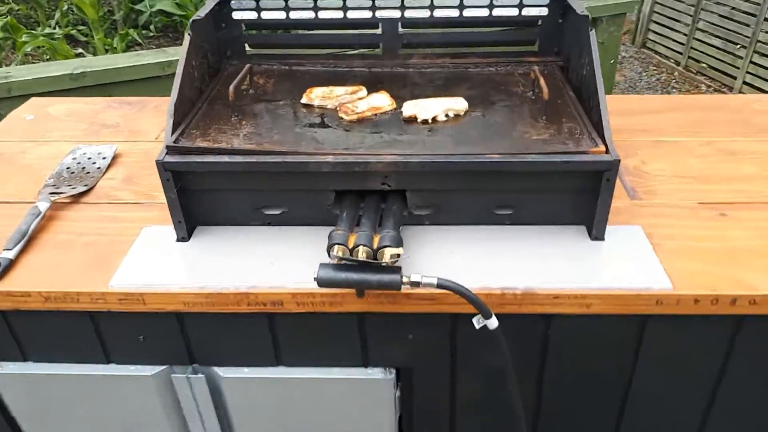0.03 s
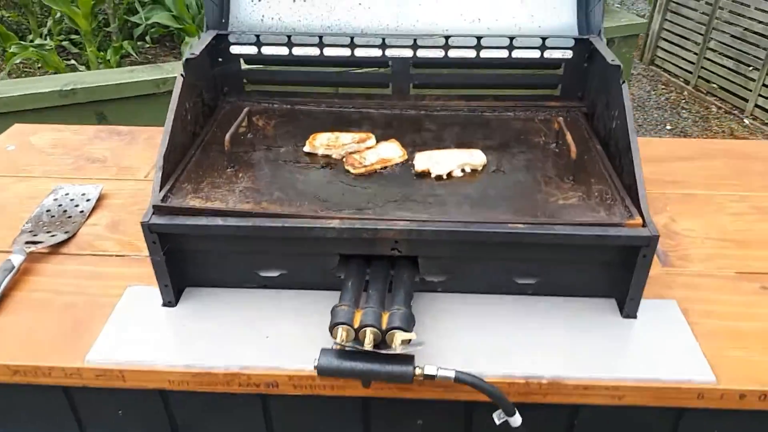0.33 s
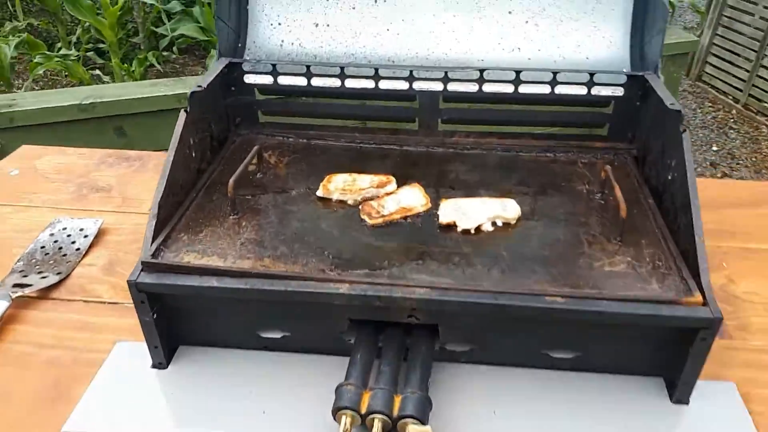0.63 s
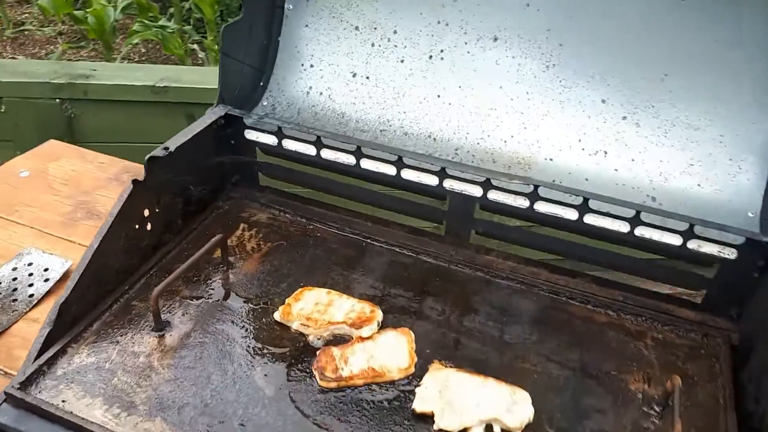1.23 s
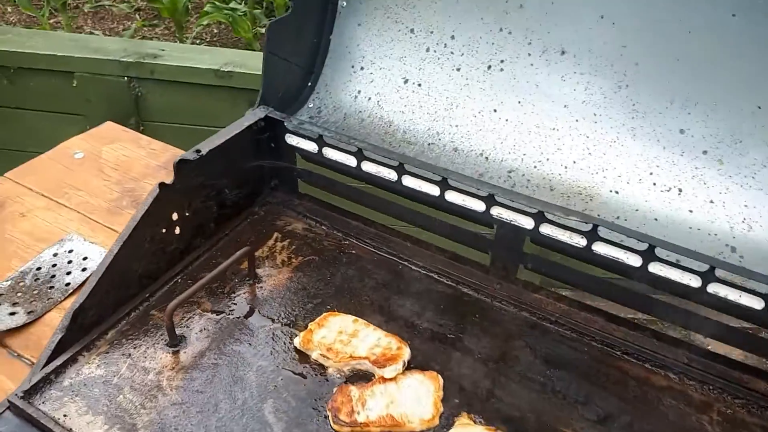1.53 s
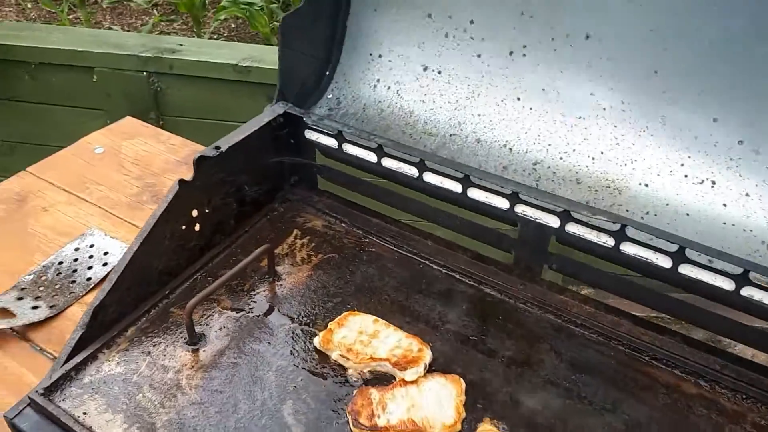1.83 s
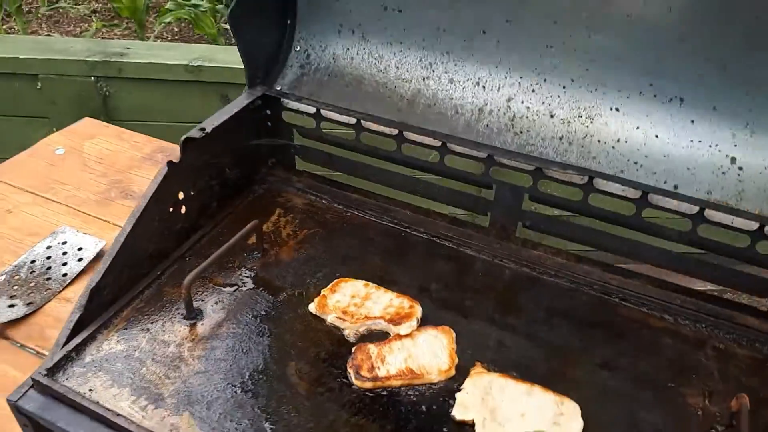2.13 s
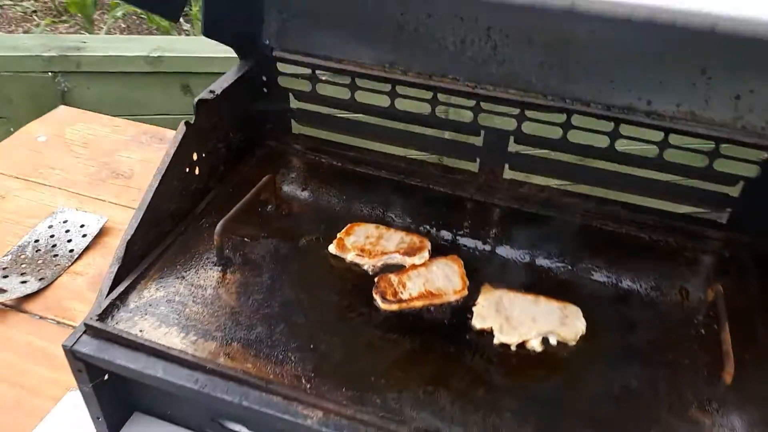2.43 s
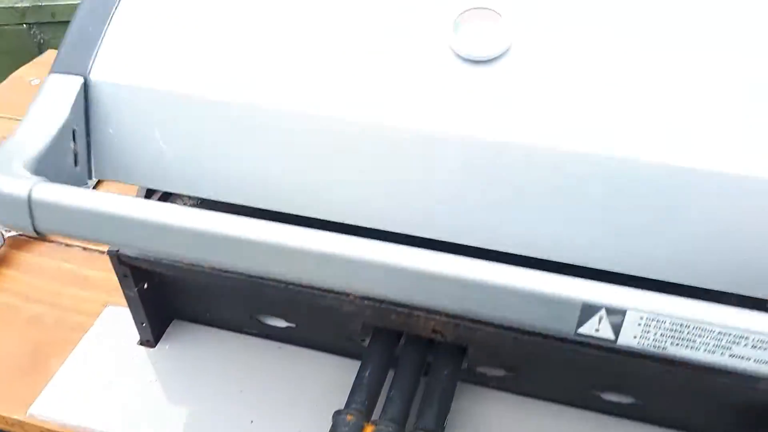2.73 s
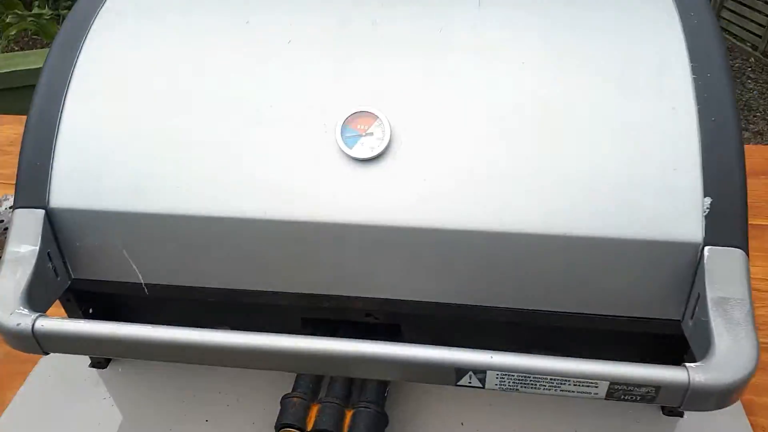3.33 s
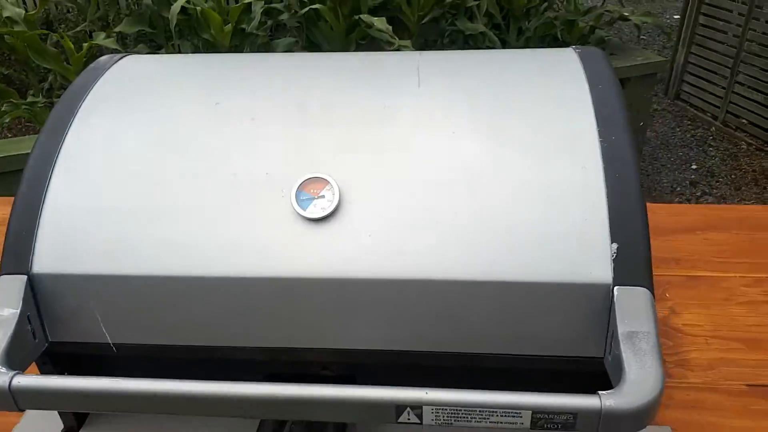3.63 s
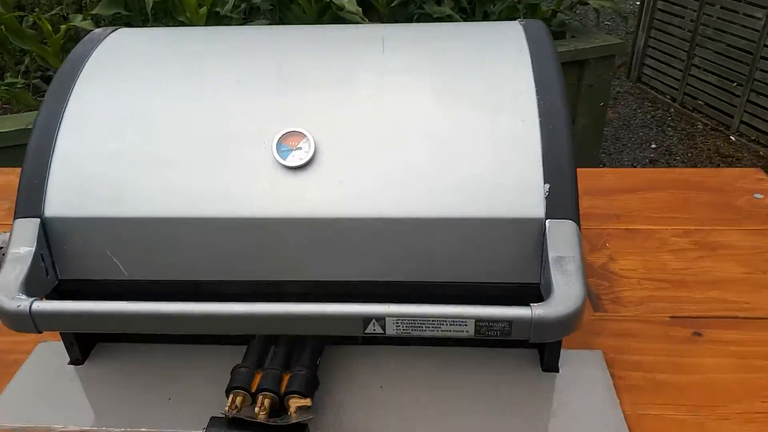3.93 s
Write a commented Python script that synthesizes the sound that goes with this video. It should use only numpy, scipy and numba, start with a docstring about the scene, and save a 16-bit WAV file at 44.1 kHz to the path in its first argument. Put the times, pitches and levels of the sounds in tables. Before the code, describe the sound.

Meat sizzles, bubbles and spits on an outdoor griddle, growing louder as the microphone comes close. A steel lid scrapes down on its hinges and lands with a heavy, ringing clang, leaving the sizzle much quieter.

```python
"""Closing the lid on a griddle

Outdoors, close to a gas griddle, over a faint rumble. Meat sizzles: water flashes to steam in a
fine fizz, fat bubbles and spits, all louder as the microphone comes near the plate. The sheet-steel
lid is pulled down on scraping hinges, lands at 3.1 s with a heavy, chattering clang and rings on.
Under the shut lid the sizzle is much quieter."""
import sys
import numpy as np
from scipy import signal
from scipy.fft import rfft, irfft
from scipy.io import wavfile
from scipy.ndimage import uniform_filter1d, map_coordinates
from numba import njit

SR = 44100
rng = np.random.default_rng(int(sys.argv[2]) if len(sys.argv) > 2 else 0)


def to_wav(sig):
    """Store sig (one row per channel, or 1-D mono) as 16-bit WAV at the path in sys.argv[1].

    Samples outside -1..1 are clipped; the rate is SR.
    """
    pcm = np.clip(np.atleast_2d(sig), -1, 1) * 32767
    pcm = np.round(pcm).astype(np.int16)
    wavfile.write(sys.argv[1], SR, pcm.T)  # frames by channels


N = 176400
T = np.arange(N) / SR

# likeness of the noise on the two sides of the microphone: freq_hz, correlation
LIKENESS = [(50, .93), (140, .997), (300, .96), (600, .7), (1200, .3), (2300, .06), (6000, .01)]
# stereo lean of the whole scene: freq_hz, left_minus_right_db
BALANCE = [(120, 2.2), (250, -0.5), (450, 2), (700, 0.5), (1250, -5.5), (2300, -5), (3200, 3), (4400, 6),
           (6000, -3), (7700, -5.5), (9200, 1), (11000, -1), (15000, 2)]
# slow rise of the outdoor rumble: time_s, gain_db
RUMBLE_RISE = [(0, 2.5), (.6, 2.5), (1.3, 4), (1.9, 5.5), (2.6, 6), (4, 7.5)]
# fizz, hiss (strongest over the plate) and bubbling fat at the microphone: time_s, level_db
FIZZ_LEVEL = [(0, -46.5), (.4, -48), (.75, -45.5), (1.35, -44), (1.9, -44), (2.3, -42), (2.6, -42),
              (2.76, -48), (3.08, -51.5), (3.25, -56), (3.62, -57), (3.78, -51.5), (3.83, -59.5),
              (4, -60.5)]
HISS_LEVEL = [(0, -73.5), (.5, -56), (.9, -55), (1.4, -50), (2.1, -49.5), (2.55, -52.5), (2.8, -56),
              (3.1, -59.5), (3.6, -73), (3.78, -65), (3.85, -74), (4, -68)]
BUBBLE_LEVEL = [(0, -56), (.45, -50.5), (.7, -50), (1.4, -44), (2.1, -45.5), (2.6, -54), (2.85, -52.5),
                (3.25, -54.5), (3.62, -59.5), (3.77, -55.5), (3.84, -63), (4, -62)]
# spectra of the open air and of the cooking: freq_hz, relative_db
RUMBLE_COLOUR = [(20, -44), (45, -0.5), (68, 1), (110, -7.5), (200, -13.5), (500, -25), (2000, -35),
                 (16000, -56)]
FIZZ_COLOUR = [(300, -24), (1200, 0.5), (2300, -2.5), (3200, -4.5), (5000, -9.5), (6000, -4.5),
               (7100, -1.5), (7650, 2), (8200, -6), (8900, -10.5), (11000, -5.5), (15500, -6.5)]
HISS_COLOUR = [(1000, -10.5), (2600, -6.5), (3500, -3), (4900, 6.5), (5700, -0.5), (6800, -0.5),
               (8500, -34), (16000, -41)]
SEETHE_COLOUR = [(100, -26), (250, -20), (450, 4.5), (640, -4), (900, 1), (1250, -1.5), (1600, -1.5),
                 (2100, 0.5), (2900, -4), (5000, -22), (16000, -47)]
SPIT_COLOUR = [(200, -68), (1500, 3), (3200, -3), (5000, 3), (6500, 1.5), (7700, 10.5), (9000, -6),
               (12000, -0.5), (16000, -6.5)]
SPLASH_COLOUR = [(200, -21), (700, -17), (1400, 0), (2500, 23), (3500, -14), (8000, -26), (16000, -31)]
# hollow of the open cook box, rising as the microphone comes over it: time_s, centre_hz, gain_db
BOX_HOLLOW = [(0, 1340, -5), (.45, 1600, 2.5), (.75, 1840, 9), (.97, 1840, 11), (1.25, 1970, 8.5),
              (1.5, 2120, 2), (2.1, 1980, -13), (4, 1950, 1)]
# reflection off the plate: time_s, delay_ms, gain_db
PLATE_BOUNCE = [(0, .92, -3.5), (.5, .81, -3.5), (1.1, .74, -5.5), (2, .78, -12), (3.1, .9, -12),
                (4, .98, -5)]
# bands cancelled by echoes off the steel walls: time_s, centre_hz, left_depth, right_depth
NOTCH_LOW = [(0, 576, 0.5, 0.1), (.45, 616, .7, .45), (.7, 710, 0.1, .1), (.9, 1280, 0.8, 0.55),
             (1.2, 1400, 0.9, 0.64), (1.5, 1420, 0.4, 0.2), (2.2, 1420, 0, 0)]
NOTCH_MIDDLE = [(0, 1870, 0.96, 0.13), (.47, 2000, 1, 0.0031), (.58, 2250, 0, 0), (.85, 2540, .55, 0.4),
                (1.2, 2670, 0.85, 0.38), (1.7, 2680, 0.88, 0.35), (2.4, 2460, 0.14, 0), (3, 2500, 0, 0)]
NOTCH_HIGH = [(0, 4340, 0.021, 0.68), (.45, 4250, 0.12, 0.73), (.72, 4020, 0, 0.44),
              (1.15, 3780, 0.1, 0.26), (1.6, 3740, 0, 0.41), (2.5, 3500, 0, .35), (3.2, 3700, 0, 0.089)]
# sharp spits of fat: start_s, level_db, decay_s
SPITS = [(0.17, -39, 0.0014), (0.211, -30, 0.0006), (0.286, -31.5, 0.0013), (0.333, -30, 0.0011),
         (.356, -41, 0.0029), (.4657, -39, 0.0028), (0.6687, -32.5, 0.00073), (0.708, -30.5, 0.0008),
         (0.7175, -30.5, 0.00069), (1.0322, -26.5, 0.0011), (1.273, -30, 0.001), (1.404, -33, 0.00055),
         (1.4452, -32, .0025), (1.4528, -28.5, 0.0034), (1.51, -33, 0.0013), (1.759, -30, 0.00086),
         (1.8664, -27, 0.0009), (2.3114, -27, 0.0012), (2.409, -33, 0.0011), (2.422, -26, 0.0015),
         (2.5176, -28, .0007), (2.528, -32, 0.00063), (2.8377, -39, 0.0025)]
# big bubbles that pop: start_s, level_db, pitch_hz
POPS = [(0.286, -35, 1620), (0.5536, -36, 1900), (.569, -36, 1520), (0.6089, -31.5, 2140),
        (.622, -36, 1600), (0.702, -34, 1890), (0.7687, -35, 1970), (0.9617, -28, 1860), (.976, -38, 2050),
        (1.032, -33, 1890), (1.154, -35, 2020), (1.2461, -32, 1910), (1.5105, -30.5, 1300),
        (1.8645, -30, 1090), (1.994, -25, 1990), (2.147, -33, 2040), (2.3256, -29, 1900)]
# three spurts of steaming juice, then a bright, ringing tick of the handle as the hand lets go:
# peak_s, level_db, rise_s, decay_s
SPURTS_AND_TICK = [(2.467, -37.5, 0.0024, .008), (2.519, -32, 0.0042, 0.013), (2.588, -34, 0.0079, 0.0083),
                   (3.423, -44, 0.014, 0.034)]

# rub of the hinges as the lid swings, then slides down the last stretch: time_s, level_db
SWING_LEVEL = [(1.0, -100), (1.4, -61.5), (1.85, -55), (2.04, -46), (2.12, -71), (2.205, -56), (2.218, -38),
               (2.245, -38), (2.28, -39.5), (2.45, -44), (2.62, -42), (2.74, -43.5), (2.85, -56),
               (2.95, -93)]
SLIDE_LEVEL = [(2.8, -100), (2.89, -50), (2.905, -43), (2.917, -33), (2.96, -35), (3.02, -34), (3.06, -37),
               (3.095, -42), (3.12, -61), (3.3, -100)]
# spectra of the two rasps, the rub that reaches the lid, and the clicks: freq_hz, relative_db
SWING_COLOUR = [(60, -26), (150, -9), (310, 0.5), (480, -2), (690, -2), (1000, -14.5), (1350, -4.5),
                (1650, -3.5), (2050, -6), (2350, -5.5), (2800, -11.5), (8000, -22.5)]
SLIDE_COLOUR = [(60, -8.5), (170, 3), (300, 6.5), (480, -4), (620, -3), (740, 4.5), (1050, -7),
                (1500, -7.5), (2100, -4.5), (2900, -9.5), (4500, -26), (10000, -36)]
HINGE_REACH = [(100, -50), (350, -28), (590, -9), (720, -3.5), (1200, 2), (1700, 6.5), (2300, -0.5),
               (3000, -11), (8000, 2)]
CLICK_COLOUR = [(200, 9.5), (850, -3.5), (1300, -8), (2000, 5), (3200, -2.5), (4150, 5.5), (5000, -47),
                (7700, 4.5), (10000, -27), (16000, -16)]
# two resonances under the lid, sinking as it closes: time_s, low_hz, low_db, high_hz, high_db
CAVITY = [(2.22, 810, -4, 2080, 0.5), (2.45, 725, -0.5, 1990, 0), (2.62, 650, -0.5, 1940, -1.5),
          (2.8, 600, -1, 1900, 0)]
# narrow rings of the rubbed steel: pitch_hz, width_hz, gain_db, left_minus_right_db
SWING_RINGS = [(1250, 290, -12.5, 17), (2900, 150, -15, 0)]
SLIDE_RINGS = [(742, 206, -4.5, -3), (1665, 120, -12.5, -4.5)]
# light knocks of lid and hinge: start_s, level_db, pitch_hz, decay_s
KNOCKS = [(1.866, -43.5, 128, 0.064), (2.2136, -27.5, 895, 0.0027), (2.222, -25, 324, 0.0096),
          (2.238, -26, 2037, 0.0061), (2.243, -31.5, 1394, 0.011), (2.513, -37, 2290, 0.028),
          (2.592, -36, 2314, 0.02), (3.41, -36, 163, 0.027), (3.583, -45.5, 864, 0.0063)]
# small metal clicks of hinge and handle: start_s, level_db, decay_s
CLICKS = [(2.2143, -36, 0.0032), (3.4174, -37.5, 0.012), (3.5837, -49.5, 0.0043), (3.69, -48, 0.0033)]
# modes of the steel lid: pitch_hz, relative_db, t60_s
LID_MODES = [(74, -20, .5), (116, -24, .35), (143, -17, .3), (150.5, -27, 2.4), (161, -27, 1.8),
             (169, -11, .34), (188, -6, .53), (225, -18, .42), (250, -16, .65), (300, -22, .7),
             (326, -16, .22), (358, -12, .18), (384, -22, .64), (426, -21, .55), (458, -18.5, .5),
             (505, -21, .22), (591, -13, .2), (700, -29, .3), (728, -25, .2), (770, -28, .2),
             (845, -25, .24), (1205, -30, .2), (1280, -34, .25), (1420, -35, .22), (1670, -36, .35),
             (1760, -32, .15), (1890, -39, .35), (2083, -34, .25), (2289, -40, .3)]
# the lid lands and chatters: start_s, strength_db
CONTACTS = [(3.0996, 0.5), (3.1105, 3), (3.1234, 0), (3.1344, -4), (3.154, -6), (3.168, -9.5)]
# spectra of the sheet's dense ring and of each contact's crack: freq_hz, relative_db
SHEET_COLOUR = [(30, -47), (70, -18), (140, 4), (240, 2.5), (450, -4), (560, -15), (750, -10.5),
                (1000, -20), (1350, -23), (2100, -18), (3000, -39), (8000, -37), (16000, -64)]
CRACK_COLOUR = [(30, -47), (70, -43), (200, 7), (400, 1.5), (700, -9.5), (1200, -16), (2000, -23.5),
                (3000, -32.5), (5500, -32), (9000, -40.5), (16000, -42)]

SLIPS_PER_S, SLIP_SPREAD_DB = 700, -1.5


def amp(db):
    """Decibels to gain."""
    return 10 ** (np.asarray(db) / 20)


def unit(x):
    """Scale to rms 1."""
    return x / np.sqrt(np.mean(x ** 2))


def pan(db):
    """Left and right gains for a level difference."""
    return amp([[db / 2], [-db / 2]])


def tracks(rows):
    """Follow each column of (time_s, ...) rows sample by sample."""
    times, *columns = np.array(rows, float).T
    return [np.interp(T, times, column) for column in columns]


def curve(points):
    """Gain over time from (time_s, level_db) points."""
    return amp(tracks(points)[0])


def fade(start, decay_s):
    """Sudden start and exponential decay."""
    return (T >= start) * np.exp(-np.clip((T - start) / decay_s, 0, 60))


def per_bin(points):
    """Spread (freq_hz, value) points over a log-frequency axis."""
    hz, value = np.array(points).T
    return np.interp(np.log(np.fft.rfftfreq(N, 1 / SR) + 1), np.log(hz), value)


def colour(x, points):
    """Causal filter of unit power gain with the given spectrum."""
    cepstrum = irfft(np.log(unit(amp(per_bin(points)))), N)
    cepstrum[1:N // 2] *= 2  # fold to minimum phase
    cepstrum[N // 2 + 1:] = 0
    return irfft(rfft(x) * np.exp(rfft(cepstrum)), N)


@njit
def resonate(x, hz, width_hz):
    """Band-pass with a moving centre, gain 1 at the centre."""
    y = np.empty_like(x)
    for side in range(2):
        band_state, low_state = 0., 0.
        for i in range(x.shape[1]):
            step, damping = np.tan(np.pi * hz[i] / SR), width_hz / hz[i]
            band = (band_state + step * (x[side, i] - low_state)) / (1 + step * (step + damping))
            band_state = 2 * band - band_state
            low_state += 2 * step * band
            y[side, i] = damping * band
    return y


def steep_band(x, hz, width_hz):
    """Two band-passes in a row, scaled to rms 1."""
    centre = np.full(N, hz, float)
    return unit(resonate(resonate(x, centre, width_hz), centre, width_hz))


def noise():
    """Stereo noise, alike in the bass and unrelated in the treble."""
    like = np.clip(per_bin(LIKENESS), 0, 1)
    mid, side = rfft(rng.standard_normal((2, N))) * np.sqrt([1 + like, 1 - like])
    return unit(irfft(np.array([mid + side, mid - side]), N))


def crackle(per_s, spread_db, decay_s):
    """A dense rain of tiny noise bursts of uneven size."""
    size = amp(spread_db * np.minimum(rng.exponential(size=N), 7))
    onsets = (rng.random(N) < per_s / SR) * size ** 2
    energy = signal.lfilter([1], [1, -np.exp(-2 / (decay_s * SR))], onsets + 1e-12)
    return unit(noise() * np.sqrt(energy))


def outdoor_rumble(gain_db=-62.5):
    """The open air behind the griddle: a faint, low noise that slowly rises."""
    return amp(gain_db) * curve(RUMBLE_RISE) * colour(noise(), RUMBLE_COLOUR)


def sizzle(per_s=4500, spread_db=2.4, decay_s=.0008):
    """Water flashes to steam in countless tiny bursts: a bright fizz, and a hiss to the right."""
    fizz = colour(crackle(per_s, spread_db, decay_s), FIZZ_COLOUR) * curve(FIZZ_LEVEL)
    hiss = colour(crackle(per_s, spread_db, decay_s), HISS_COLOUR) * curve(HISS_LEVEL)
    return fizz + hiss * pan(db=-5)


def bubbles(per_s=800, low_hz=700, high_hz=2500, spread_db=3.3, decay_cycles=3, lag_s=.00047):
    """Small bubbles burst all over the plate, each a few cycles long, over a seething bed."""
    t = T[:1024]
    pings = np.zeros((2, N + len(t)))
    for when, pitch, size, place in rng.random((int(per_s * N / SR), 4)):
        start = int(when * N)
        hz = low_hz * (high_hz / low_hz) ** pitch
        age = np.maximum(t - lag_s * np.array([[2 * place], [1]]), 0)  # the nearer side hears it first
        gain = amp(spread_db * min(-np.log(1 - size), 2 * np.e))
        ping = np.sin(2 * np.pi * hz * age) * np.exp(-age * hz / decay_cycles)
        pings[:, start:start + len(t)] += gain * ping
    seethe = amp(3) * colour(crackle(per_s=1000, spread_db=2.08, decay_s=.0043), SEETHE_COLOUR)
    return unit(cook_box(unit(pings[:, :N]) + seethe)) * curve(BUBBLE_LEVEL)


def cook_box(x, width_hz=153):
    """The box adds a hollow resonance and a reflection; both shift as the microphone moves."""
    hz, hollow_db = tracks(BOX_HOLLOW)
    x = x + pan(db=-1) * amp(hollow_db) * resonate(x, hz, width_hz)
    delay_ms, bounce_db = tracks(PLATE_BOUNCE)
    bounce = np.array([np.interp(T - delay_ms / 1000, T, side) for side in x])
    return x + amp(bounce_db) * bounce


def steel_walls(x):
    """Echoes off the walls cancel three bands, which shift as the microphone moves."""
    for rows, width_hz in (NOTCH_LOW, 360), (NOTCH_MIDDLE, 390), (NOTCH_HIGH, 1400):
        hz, *depths = tracks(rows)
        x = x - np.array(depths) * resonate(x, hz, width_hz)
    return x


def spits_and_tick(echo_db=-18, echo_s=.023, mic_ring_hz=7620, mic_ring_width_hz=110, mic_ring_db=15):
    """Fat spits, echoed by the steel walls; spurts and a handle tick with a narrow microphone ring."""
    snaps = sum(amp(db) * (fade(s, decay) + amp(echo_db) * fade(s, echo_s)) for s, db, decay in SPITS)
    bursts = np.zeros(N)
    for peak_s, db, rise_s, decay_s in SPURTS_AND_TICK:
        from_peak = np.maximum((peak_s - T) / rise_s, (T - peak_s) / decay_s)
        bursts += amp(db) * np.exp(-np.minimum(from_peak, 20))
    mic_ring = amp(mic_ring_db) * resonate(bursts * noise(), np.full(N, mic_ring_hz), mic_ring_width_hz)
    grit = np.sign(noise())  # samples of one size keep very short snaps even
    return colour((snaps + bursts) * grit, SPIT_COLOUR) + mic_ring


def pops(rise_cycles=.87, splash_db=-10, splash_decay_s=.0025):
    """Big bubbles pop, each with a short, rounded tone and a splash."""
    tones, splashes = np.zeros((2, N))
    for start, db, hz in POPS:
        rise = np.clip((T - start) * hz / rise_cycles, 0, 60)
        tones += amp(db) * rise * np.exp(1 - rise) * np.sin(2 * np.pi * hz * (T - start))
        splashes += amp(db + splash_db) * fade(start, splash_decay_s)
    return tones + colour(splashes * np.sign(noise()), SPLASH_COLOUR)


def scrape(level, spectrum, rasp_db, ring_db):
    """Dry steel sticks and slips: a rasp, and the lid's modes singing along."""
    slips = crackle(SLIPS_PER_S, SLIP_SPREAD_DB, decay_s=.0037) * curve(level)
    modes = sum(amp(db - 60 * T / t60) * np.sin(2 * np.pi * hz * T) for hz, db, t60 in LID_MODES)
    ring = signal.fftconvolve(colour(slips, HINGE_REACH), modes[None], axes=1)[:, :N]
    return amp(rasp_db) * colour(slips, spectrum) + amp(ring_db) * np.std(slips) * unit(ring)


def cavity(gain_db=-3, low_width_hz=252, high_width_hz=345.24):
    """The scraping hinges sound the shrinking space under the lid."""
    low_hz, low_db, high_hz, high_db = tracks(CAVITY)
    slips = crackle(SLIPS_PER_S, SLIP_SPREAD_DB, decay_s=.012)
    low = amp(low_db) * steep_band(slips, low_hz, low_width_hz)
    high = amp(high_db) * steep_band(slips, high_hz, high_width_hz)
    return amp(gain_db) * curve(SWING_LEVEL) * (low + high)


def rubbed_steel(rings):
    """Slips of the hinges keep a few narrow resonances sounding."""
    slips = crackle(SLIPS_PER_S, SLIP_SPREAD_DB, decay_s=.0023)
    return sum(amp(db) * pan(side) * steep_band(slips, hz, width) for hz, width, db, side in rings)


def hinges():
    """The hinges rub as the lid swings over, then slides down the last stretch."""
    swing = scrape(SWING_LEVEL, SWING_COLOUR, rasp_db=-1, ring_db=-10.5) + cavity()
    first_click_s = CLICKS[0][0]
    swing += rubbed_steel(SWING_RINGS) * curve(SWING_LEVEL) * fade(first_click_s, decay_s=.47)
    slide = scrape(SLIDE_LEVEL, SLIDE_COLOUR, rasp_db=-5.5, ring_db=-6)
    slide += rubbed_steel(SLIDE_RINGS) * curve(SLIDE_LEVEL)
    return swing + slide


def knocks():
    """Lid and hinge knock lightly: damped tones with a half-cycle attack."""
    return sum(amp(db) * (fade(s, decay) - fade(s, .5 / hz)) * np.sin(2 * np.pi * hz * (T - s))
               for s, db, hz, decay in KNOCKS)


def clicks():
    """Hinge and handle click, metal on metal, in short bursts of noise."""
    bursts = sum(amp(db) * fade(s, decay) for s, db, decay in CLICKS)
    return colour(bursts * np.sign(noise()), CLICK_COLOUR)


def clang(contact_s=.0028):
    """Every contact feeds more energy into the lid's modes, which ring on."""
    blows, ring = np.zeros((2, N))
    for start, db in CONTACTS:
        blows[int(start * SR)] += amp(db)
    first = int(CONTACTS[0][0] * SR)
    power = uniform_filter1d(blows ** 2, int(contact_s * SR))[first:]
    for hz, db, t60 in LID_MODES:
        retained = np.exp(-2 * np.log(1000) / (t60 * SR))
        energy = np.abs(signal.lfilter([1], [1, -retained], power))
        ring[first:] += amp(db) * np.sqrt(energy) * np.sin(2 * np.pi * hz * T[:N - first])
    return ring


def rocking(age, rate_hz=45, depth_db=1.5, onset_s=.12):
    """The landed lid rocks: a gain that wavers smoothly at random."""
    wander = map_coordinates(rng.standard_normal(1024), [T * rate_hz], mode="mirror")
    return amp(depth_db * np.clip(age / onset_s, 0, 1) * wander)


def chatter(decay_s):
    """Each contact of the lid adds a dying burst of noise."""
    energy = sum((amp(db) * fade(start, decay_s)) ** 2 for start, db in CONTACTS)
    return noise() * np.sqrt(energy)


def slam(thud_hz=176, attack_s=.0041, hold_s=.0204, release_s=.0072):
    """The lid lands: the cook box thuds, and every contact cracks and sets the sheet ringing."""
    age = T - CONTACTS[0][0]
    ring = amp(-18.5) * clang() * rocking(age)
    pressed = np.interp(age, np.cumsum([0, attack_s, hold_s, release_s]), [0, 1, 1, 0])
    thud = amp(-6.5) * pressed * np.sin(2 * np.pi * thud_hz * age)
    sheet = amp(-31.5) * colour(chatter(decay_s=.092), SHEET_COLOUR)
    crack = amp(-15.5) * colour(chatter(decay_s=.016), CRACK_COLOUR)
    return ring + thud + sheet + crack


def scene():
    """Griddle and lid close to the microphone, a little to the right, over the outdoor rumble."""
    mix = steel_walls(sizzle() + bubbles()) + spits_and_tick() + pops()
    mix += clicks() + knocks() + hinges() + slam() + outdoor_rumble()
    lean_db = per_bin(BALANCE) / 2
    return irfft(rfft(mix) * amp([lean_db, -lean_db]), N)


def record(dry):
    """The recorder thins the deepest bass and cuts the top steeply."""
    low_cut_hz, top_hz = 68, 16000
    thinned = signal.sosfilt(signal.butter(2, low_cut_hz, "high", fs=SR, output="sos"), dry)
    return signal.sosfilt(signal.ellip(10, .2, 80, top_hz, fs=SR, output="sos"), thinned)


dry = scene()
out = record(dry)
to_wav(out)
```